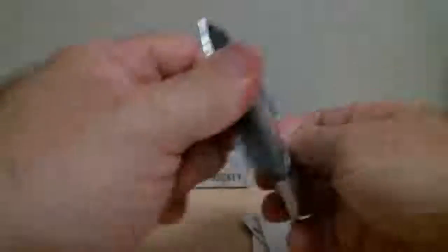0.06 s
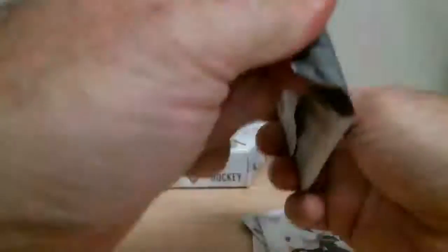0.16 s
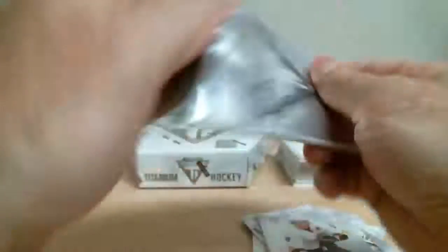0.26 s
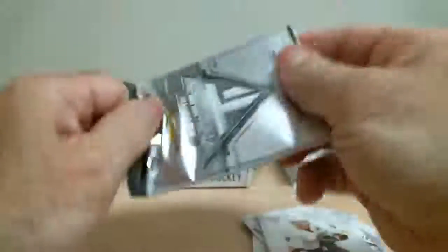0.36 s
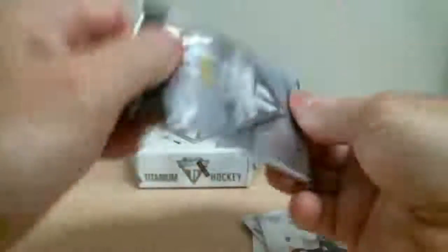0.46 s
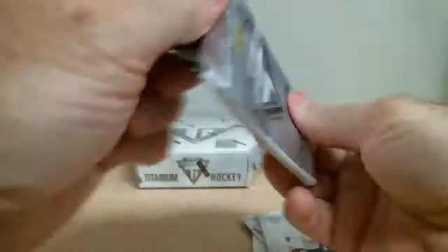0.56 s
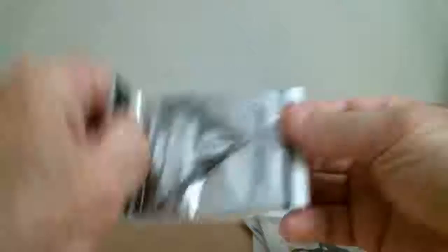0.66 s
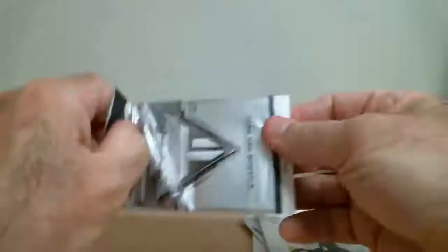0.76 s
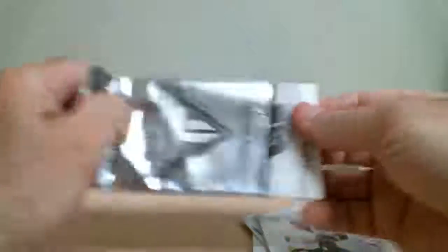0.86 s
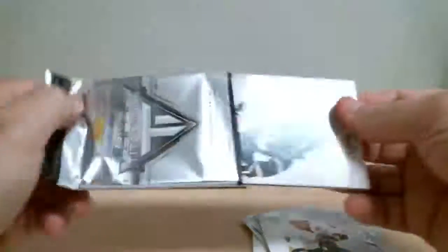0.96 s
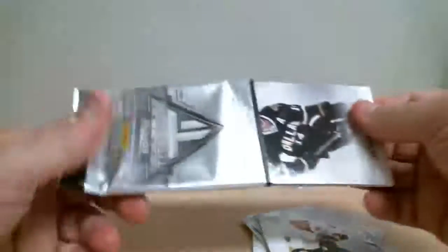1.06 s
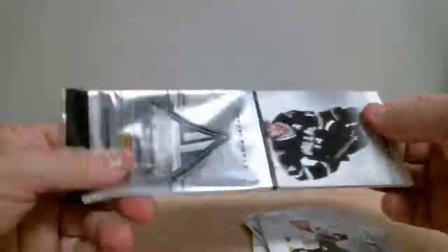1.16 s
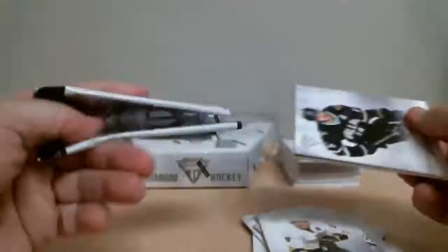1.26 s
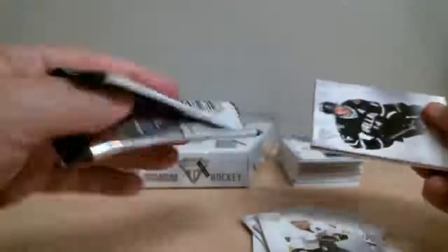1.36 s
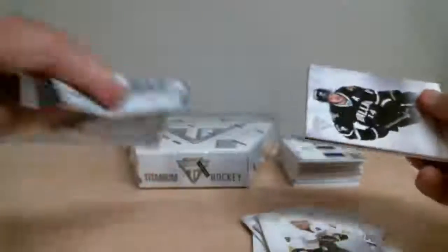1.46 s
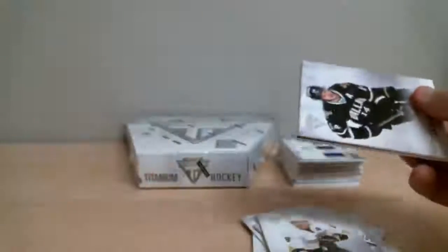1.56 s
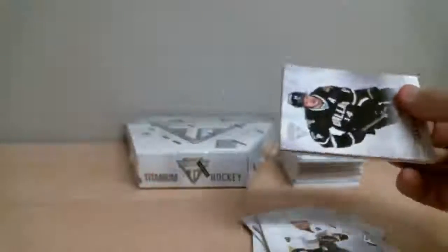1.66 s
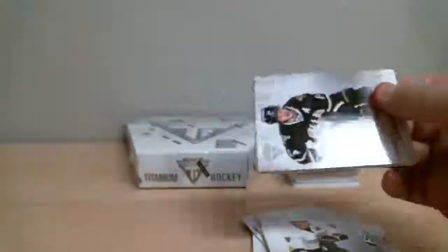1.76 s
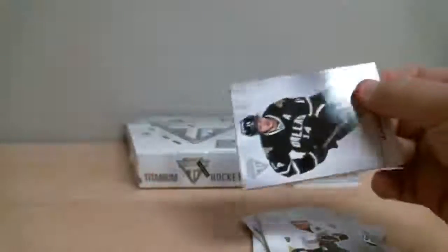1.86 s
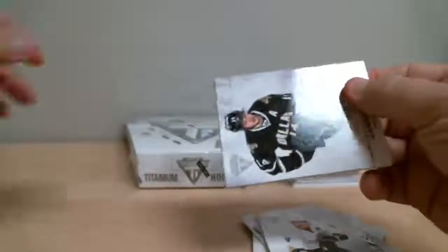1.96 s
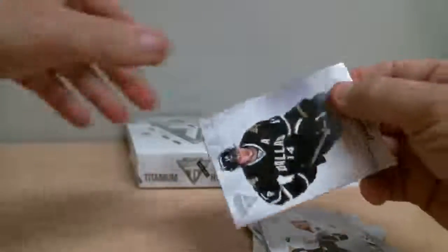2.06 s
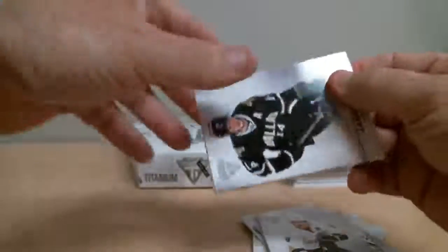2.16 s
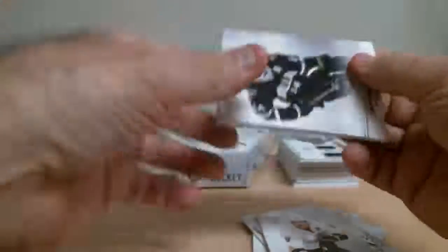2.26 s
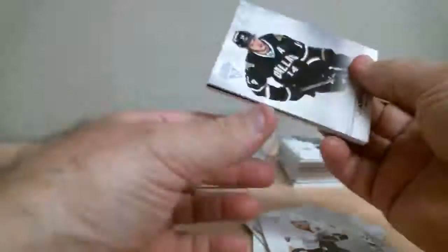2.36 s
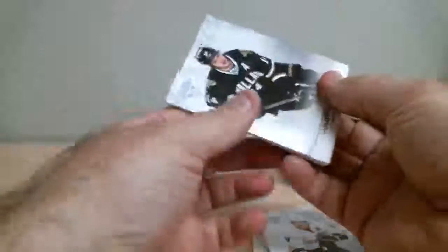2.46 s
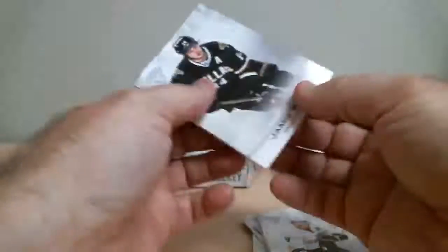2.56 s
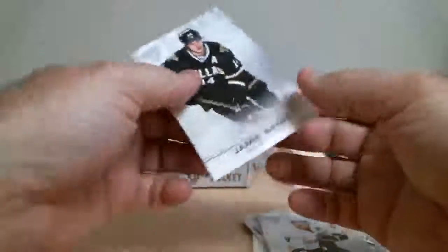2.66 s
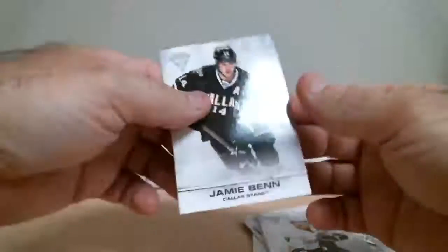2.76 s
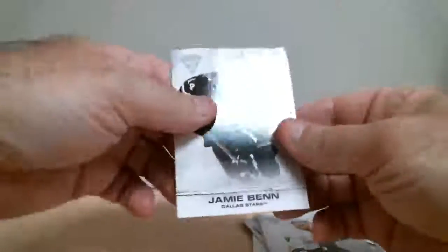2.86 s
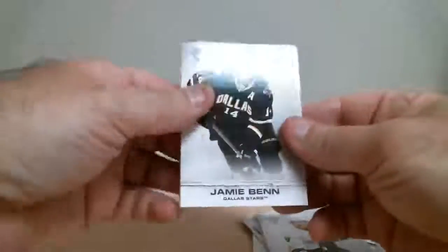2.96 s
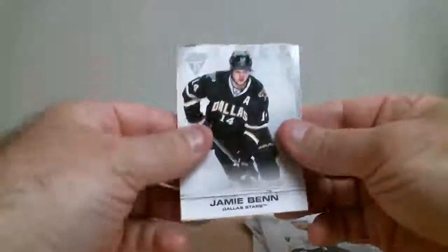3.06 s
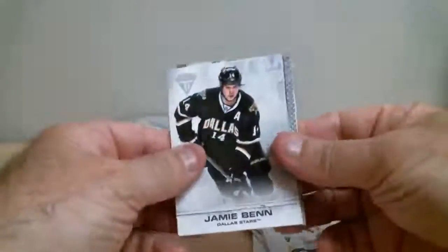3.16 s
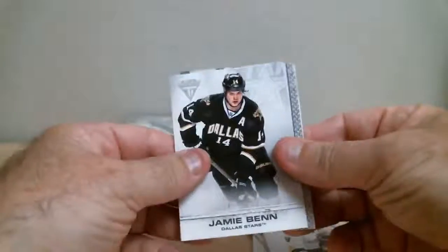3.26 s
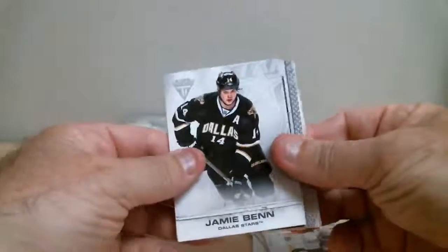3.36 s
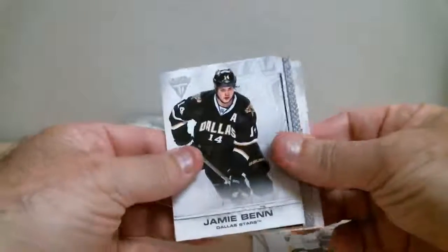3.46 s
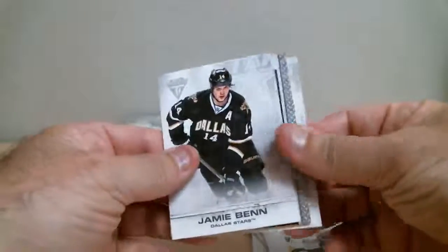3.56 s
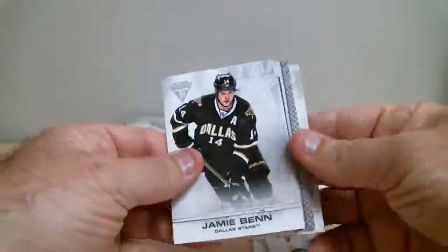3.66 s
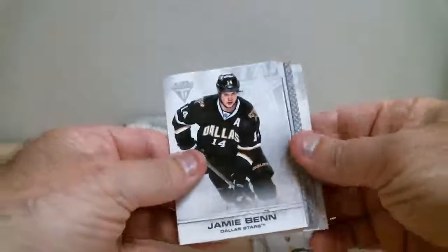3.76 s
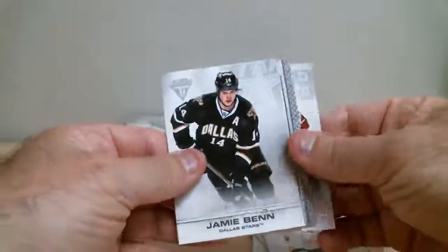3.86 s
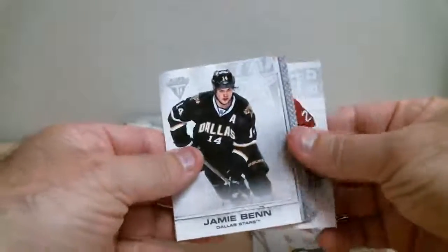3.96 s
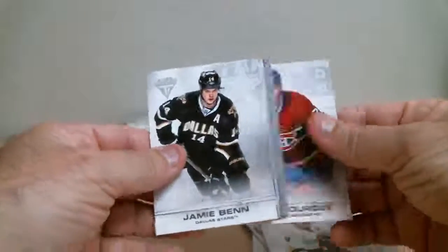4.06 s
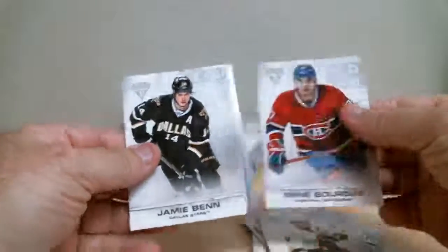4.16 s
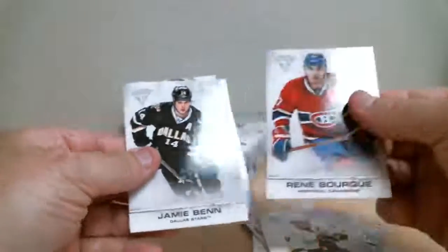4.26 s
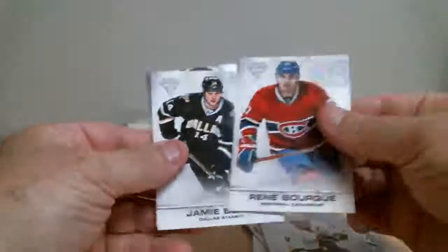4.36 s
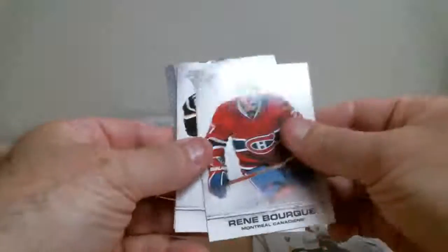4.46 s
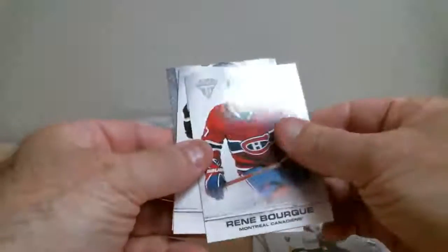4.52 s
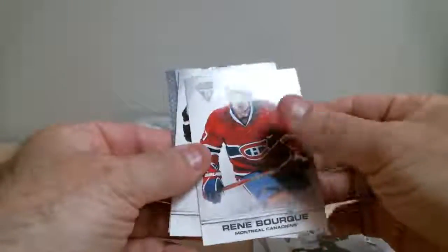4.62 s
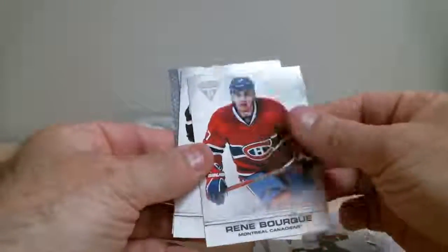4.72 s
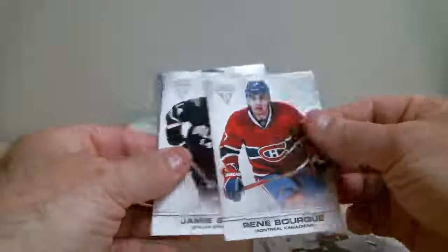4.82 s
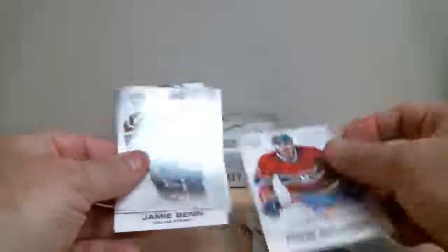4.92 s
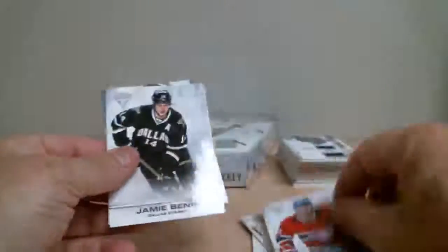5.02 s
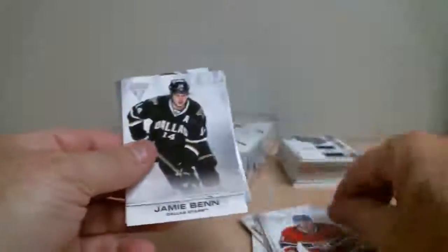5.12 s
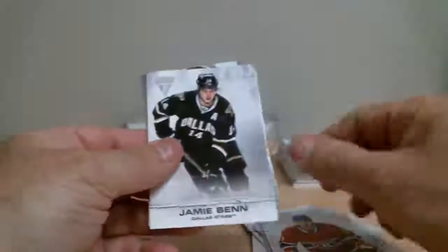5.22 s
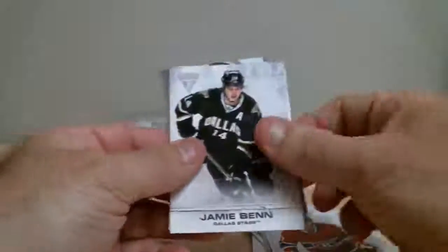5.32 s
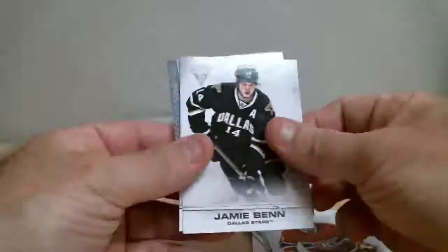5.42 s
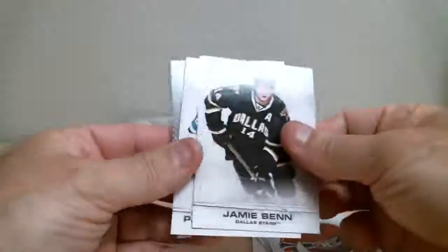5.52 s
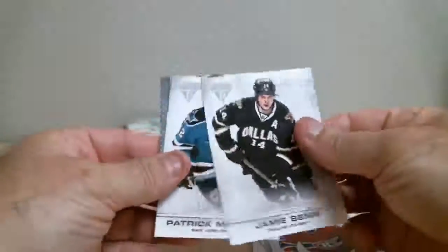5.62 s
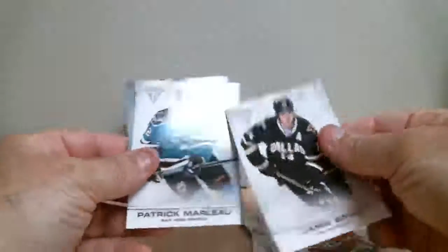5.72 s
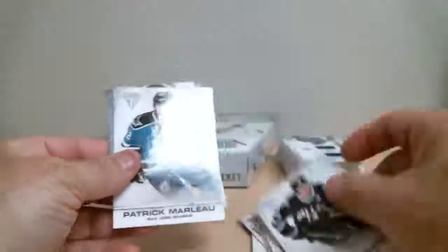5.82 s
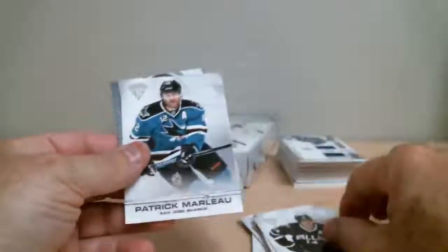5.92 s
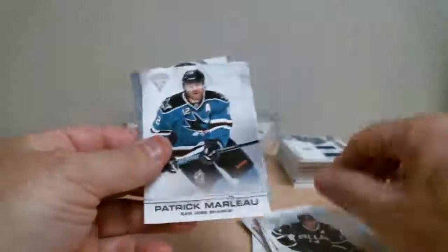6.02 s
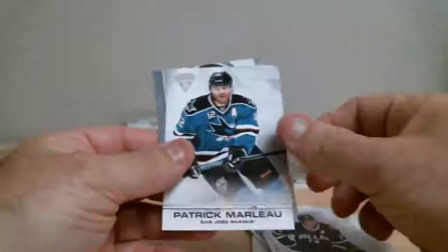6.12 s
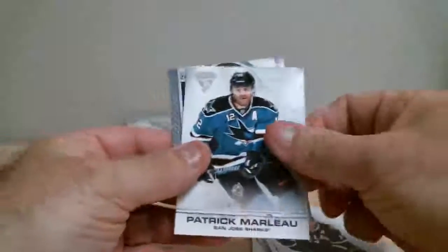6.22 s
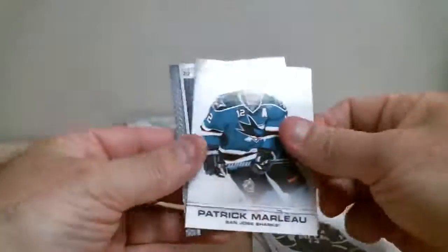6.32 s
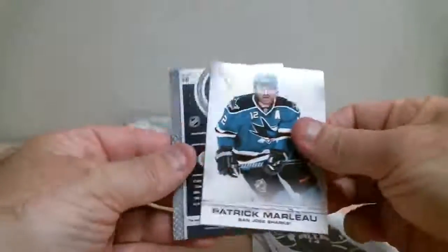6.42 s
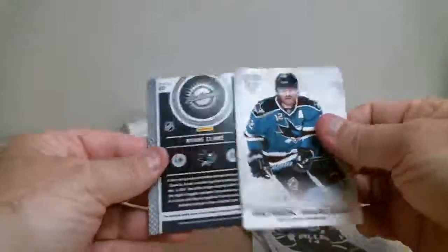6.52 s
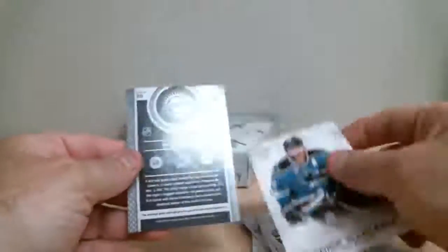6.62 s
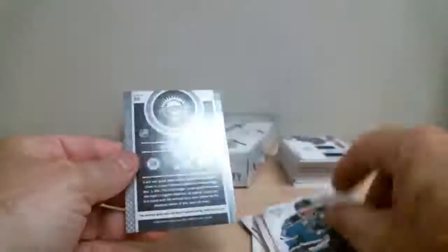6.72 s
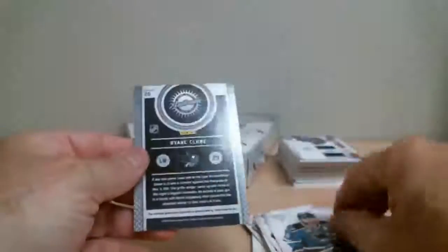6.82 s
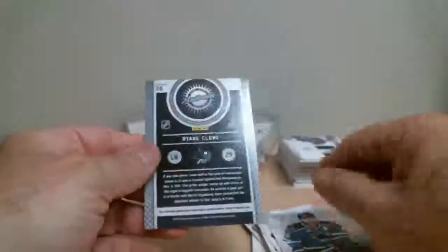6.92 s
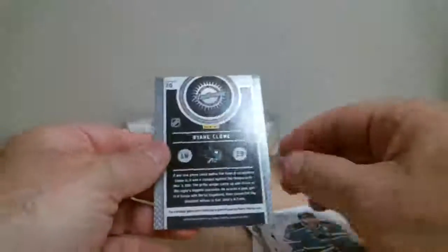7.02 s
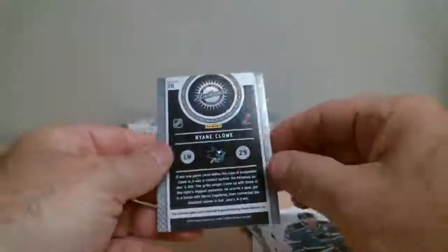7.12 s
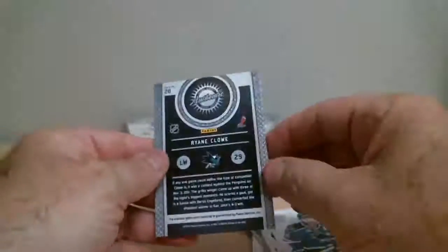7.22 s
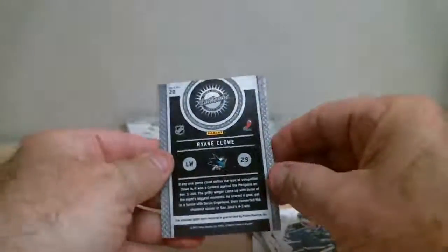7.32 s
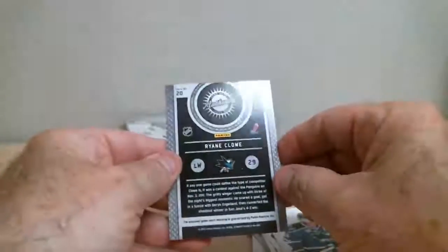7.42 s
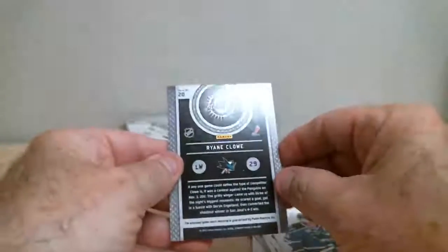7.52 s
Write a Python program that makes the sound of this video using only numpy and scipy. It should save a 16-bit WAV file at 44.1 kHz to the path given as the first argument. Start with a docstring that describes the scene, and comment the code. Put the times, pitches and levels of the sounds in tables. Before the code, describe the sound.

Very close to the microphone, a foil packet is squeezed and torn with loud, bright snaps and dense crackle. After about a second and a half it stops, and stiff glossy cards are handled much more softly: edge clicks, faint rubbing, and three small tap-and-flick sounds as cards are laid on a wooden table. A low fan hum fills the small room throughout.

```python
"""A small room with a humming computer fan: close to a microphone, a foil pack of trading cards is torn and crumpled.
Buckling creases are bursts with damped modes, over a crackle of filtered impulses and a gliding hollow note.
Then the cards are thumbed: edges click as struck modes, faces rub in dense micro-slips, and cards are laid down
on a wooden table, whose knocks are sums of decaying sines. Low rumbles are band-passed impulses.
The fan is filtered noise with narrow-band tones."""
import sys
import numpy as np
from scipy import signal
from scipy.fft import rfft, irfft, next_fast_len
from scipy.io import wavfile
from scipy.ndimage import uniform_filter1d, minimum_filter1d

SR = 44100
rng = np.random.default_rng(int(sys.argv[2]) if len(sys.argv) > 2 else 0)


def log_audio(samples):
    """Write samples as a 16-bit WAV file to the path given in sys.argv[1]."""
    # one column per channel
    frames = np.atleast_2d(samples).T
    # limit to full scale, then quantise
    limited = np.clip(frames, -1, 1)
    pcm = np.round(limited * 32767).astype(np.int16)
    wavfile.write(sys.argv[1], SR, pcm)


N = 334410
TIME = np.arange(N) / SR
TOP_HZ = 15700  # upper limit of the sound

# Spectral colour of foil. Each row: frequency in Hz, gain in dB.
FOIL_COLOUR = [(100, -33), (600, -26), (1300, -14), (2000, -2), (2900, 0.5), (4500, -4.5), (7000, -2.5),
               (10500, 0), (12800, -7), (15500, -14.5)]
# Squeezes or pulls of the pack. Each row: time when firm in s, attack in s, hold in s, release in s,
# crackle drive in dB, panel drive in dB (both relative).
SQUEEZES = [(0.0, .01, 0.078, 0.076, -28.5, -64.5), (0.111, 0.0092, 0.025, 0.15, -23, -33.5),
            (0.301, 0.067, 0.04, 0.063, -13, -24.5), (0.498, .018, 0.0068, 0.05, -5.5, -16),
            (0.564, .03, 0.039, .05, -30.5, -44), (0.66, .035, 0.045, .048, -17, -27),
            (0.779, .008, 0.013, 0.017, -33, -40), (.873, 0.015, 0.12, 0.039, -24.5, -31),
            (1.025, 0.018, 0.0058, 0.019, -21.5, -41), (1.066, .014, 0.013, 0.011, -29, -28.5),
            (1.153, 0.0067, 0.013, 0.12, -17, -35), (1.248, 0.053, 0.044, .025, -16, -22),
            (1.381, .02, 0.038, 0.059, -20, -45.5), (1.529, .017, .005, .035, -22, -46.5)]


def amp(db):
    """Decibels to amplitude ratio."""
    return 10 ** (np.asarray(db) / 20)


def unit(x):
    """Scale to rms 1."""
    return x / np.sqrt(np.mean(x ** 2) + 1e-30)


def add(out, s, x):
    """Superpose x on out from time s in seconds."""
    i = max(int(s * SR), 0)
    out[i:i + len(x)] += x[:max(N - i, 0)]


def curve(rows):
    """Gain that follows (s, dB) rows and is silent after the last."""
    s, db = np.transpose(rows)
    return amp(np.interp(TIME, s, db)) * (TIME < s[-1])


def bump(f, hz, octaves):
    """A Gaussian bell on the log-frequency axis, 1 at its centre."""
    return np.exp(-.5 * (np.log2(f / hz) / octaves) ** 2)


def colour(x, points, hz=1000, bump_db=0, octaves=1, size=1024):
    """Minimum-phase filter through (Hz, dB) points, with a resonance at hz, as wide as octaves says."""
    f = np.maximum(np.arange(size // 2 + 1) * SR / size, 1)
    at, db = np.transpose(points)
    gain = amp(np.interp(np.log(f), np.log(at), db) + bump_db * bump(f, hz, octaves))
    # folding the cepstrum onto positive times makes the filter causal
    cepstrum = irfft(np.log(gain))
    cepstrum[1:size // 2] *= 2
    cepstrum[size // 2 + 1:] = 0
    response = irfft(np.exp(rfft(cepstrum)))
    return signal.fftconvolve(x, response)[:len(x)]


def narrow(hz, width):
    """Narrow-band noise: one slim resonance of random excitation is heard as a wavering tone."""
    size = next_fast_len(N)
    f = np.arange(size // 2 + 1) * SR / size
    resonance = np.exp(-2 * ((f - hz) / width) ** 2)
    return unit(irfft(rfft(rng.standard_normal(size)) * resonance)[:N])


def grains(n, rate, spread_db):
    """Shot noise: tiny impulses at random moments (rate per second), whose sizes vary by spread_db."""
    sizes = amp(spread_db * np.minimum(rng.exponential(1, n), 4))
    struck_now = rng.random(n) < rate / SR
    return unit(struck_now * rng.choice([-1, 1], n) * sizes)


def walk(n, rate):
    """Random modulation: independent levels, rate per second, joined by straight ramps."""
    k = int(SR / rate)
    steps = np.repeat(rng.standard_normal(n // k + 2), k)
    return uniform_filter1d(steps, k)[rng.integers(k):][:n]


def burst(decay_ms, hz, ring, ring_ms, count=5):
    """Impulsive excitation: a sheet jumps with a brief crack and a few damped modes of the facet that moved."""
    t = TIME[:SR // 25]
    ms = 1000 * t
    crack = rng.standard_normal(len(ms)) * np.exp(-ms / decay_ms)
    modes = np.minimum(hz * 2 ** (.5 * rng.standard_normal((count, 1))), TOP_HZ)
    return crack + ring * np.sin(2 * np.pi * modes * t).sum(0) * np.exp(-ms / ring_ms)


def struck(x, db, size=88):
    """Set the rms level of the first samples of a blow."""
    return x * amp(db) / np.sqrt(np.mean(x[:size] ** 2))


def fan():
    """Broadband air noise, narrow-band motor and blade tones, and a mains hum that swells, sinks and swells."""
    # Spectral colour of the air noise. Each row: frequency in Hz, gain in dB.
    air_colour = [(15, -54), (25, -24), (113, -11.5), (240, -8.5), (305, -5), (509, -11), (598, -8),
                  (945, -17), (2170, -18.5), (3930, -29), (4380, -30.5), (8130, -35.5), (15500, -47)]
    # Motor and blade tones. Each row: frequency in Hz, level in dB, width in Hz.
    tones = [(289.3, -62, 5.1), (324, -64.5, 6), (597, -68, 6), (805, -75.5, 10)]
    mains_hz = 120
    air = unit(colour(rng.standard_normal(N), air_colour, size=8192)) * amp(-59)
    swell = curve([(2, -73.5), (2.7, -65), (4.9, -66.5), (5.7, -78.5), (7.7, -63.5)])
    mains = unit(np.sin(2 * np.pi * mains_hz * TIME)) * swell
    return air + mains + sum(amp(db) * narrow(hz, width) for hz, db, width in tones)


def grip(t, s, attack, hold, release):
    """Exponential envelope of one effort of the fingers: it builds, holds and dies away."""
    swing_db = 20.5  # an attack or a release spans this much
    before = np.maximum(s - t, 0) / attack
    after = np.maximum(t - s - hold, 0) / release
    return amp(-swing_db * (before + after))


def squeezing(t):
    """Driving effort on the creases and flexing of whole panels; the strongest squeeze leads in each."""
    return np.max([amp([[crackle_db], [panel_db]]) * grip(t, s, attack, hold, release)
                   for s, attack, hold, release, crackle_db, panel_db in SQUEEZES], axis=0)


def small_creases(count=330):
    """Buckling instability on a small scale: lesser snaps at random moments, each with its own pitch and size."""
    out = np.zeros(N)
    end = SQUEEZES[-1][0] + SQUEEZES[-1][3]
    moments = (np.arange(count) + 2 * rng.random(count)) / count * end
    for s, (pitch, size) in zip(moments, np.clip(rng.standard_normal((count, 2)), -2, 2)):
        hz = 5800 * 2 ** (.55 * pitch)
        crack = burst(decay_ms=.55, hz=hz, ring=.25, ring_ms=1.2)
        add(out, s, struck(colour(crack, FOIL_COLOUR, hz, bump_db=18.5, octaves=0.72), 4 * size))
    return signal.sosfilt(signal.butter(2, 1800, "high", fs=SR, output="sos"), out)


def foil_crackle(count=16):
    """Crackling noise: tiny creases on facets that come and go, lower-pitched panels, and a squeaking seam."""
    # Spectral colour of the larger panels. Each row: frequency in Hz, gain in dB.
    panel_colour = [(60, -18.5), (160, -13), (330, -9), (470, -13.5), (800, 10), (1050, 0.5), (1400, 5),
                    (2000, 4), (3300, -5.5), (7000, -29)]
    n = 2 * SR  # the crackle lies within the first two seconds
    out, facets = np.zeros(N), 0
    effort, flex = squeezing(TIME[:n])
    for hz in np.geomspace(2000, 11500, count):
        impulses = grains(n, rate=440, spread_db=4.0)
        ticks = unit(colour(impulses, FOIL_COLOUR, hz, bump_db=25, octaves=0.075))
        # large facets need a firm squeeze before they give
        gives = effort / (effort + 0.068 * (2000 / hz) ** 3)
        facets = facets + ticks * gives * amp(4 * walk(n, rate=59)) / np.sqrt(count)
    creases = facets * amp(-7) + small_creases()[:n] * amp(-0.5)
    panels = unit(colour(grains(n, rate=690, spread_db=4.5), panel_colour))
    add(out, 0, creases * effort + panels * flex * amp(-3.0))
    # the seam squeaks as it parts
    squeak = narrow(4700, 450) * amp(3.4 * walk(N, rate=220) - 26.5)
    return out + squeak * grip(TIME, s=0.062, attack=0.05, hold=0.026, release=.018)


def foil_snaps():
    """Modal radiation: each buckling crease rings its own small facet, which radiates little below its pitch."""
    # The loudest creases that buckle. Each row: start in seconds, level in dB, pitch in Hz.
    loud_creases = [(.079, -19, 7600), (0.1142, -8, 6940), (.127, -6.5, 4230), (.133, -9, 6850),
                    (0.1564, -4.5, 7090), (.1722, -15.5, 7700), (0.181, -14.5, 7060), (.227, -13.5, 7350),
                    (.24, -13, 6470), (0.2685, -10, 4525), (0.279, -6, 5550), (.2932, -3, 3010),
                    (.3042, -6.5, 5100), (.311, -5.5, 6430), (.3176, -8, 6860), (0.3221, -5, 6470),
                    (.3352, -5, 5800), (0.3414, -4, 4212), (.35, -9, 7494), (0.3592, -7, 5330),
                    (.371, -18.5, 6500), (0.4324, -17.5, 9000), (.4607, -19, 6240), (.497, -7, 6530),
                    (0.505, -4.5, 3589), (0.5119, -13, 3000), (0.518, -13, 5026), (0.543, -16, 6400),
                    (.576, -13.5, 5770), (0.6234, -15.5, 7200), (0.6538, -12, 4092), (0.662, -0.5, 6440),
                    (0.6733, -12.5, 4900), (.6955, -3.5, 3460), (.699, -4, 6120), (0.7073, -15.5, 4500),
                    (0.7803, -10.5, 6260), (0.8134, -21.5, 3900), (0.8567, -20.5, 3120),
                    (0.8737, -9.5, 6800), (0.8823, -9.5, 3530), (0.9345, -13.5, 5300), (0.973, -6, 7450),
                    (1.007, -19.5, 4300), (1.019, -18, 3880), (1.069, -17, 4195), (1.072, -17, 6600),
                    (1.0852, -20.5, 5300), (1.1506, -14.5, 4100), (1.163, -6.5, 7500), (1.171, -8, 5930),
                    (1.231, -7, 4750), (1.2666, -13, 3836), (1.299, -12, 7800), (1.3143, -14, 7060),
                    (1.342, -25, 10600), (1.3756, -9, 7000), (1.4049, -7, 4920), (1.415, -10, 5660),
                    (1.4481, -10, 6860), (1.4618, -16.5, 6700), (1.5305, -6.5, 7320)]
    out = np.zeros(N)
    for s, db, hz in loud_creases:
        snap = burst(decay_ms=1.0, hz=hz, ring=0.27, ring_ms=1.49)
        snap = colour(snap, FOIL_COLOUR, hz, bump_db=9, octaves=0.67)
        low_cut = signal.butter(2, min(0.36 * hz, TOP_HZ), "high", fs=SR, output="sos")
        add(out, s, struck(signal.sosfilt(low_cut, snap), db))
    return out


def pouch(width_hz=310):
    """Cavity resonance: crackle rings the air in the pack; the note sinks and fades as the walls move apart."""
    # Bulges of the pouch. Each row: start in seconds, length in seconds, first pitch in Hz, last pitch in Hz,
    # level in dB before the fade.
    bulges = [(.258, 0.14, 2150, 600, -27), (0.49, 0.061, 1900, 800, -18), (0.655, 0.063, 2100, 750, -23),
              (0.861, .1, 2600, 750, -32.5), (1.147, .11, 1500, 850, -21.5), (1.369, .1, 2965, 525, -26)]
    out = np.zeros(N)
    for s, length, first_hz, last_hz, db in bulges:
        u = np.linspace(0, 1, int(length * SR))
        pitch = first_hz * (last_hz / first_hz) ** u
        carrier = np.exp(2j * np.pi * np.cumsum(pitch) / SR)
        crackle = grains(len(u), rate=900, spread_db=5.5) * amp(2.1 * walk(len(u), rate=120))
        # shift the gliding pitch to 0 Hz, low-pass, then shift back
        band = signal.sosfilt(signal.butter(2, width_hz, fs=SR, output="sos"), crackle / carrier)
        note = unit((band * carrier).real)
        add(out, s, note * signal.windows.tukey(len(u), .05) * amp(db - 18.0 * u))
    return out


def low_rumbles():
    """Band-passed shot noise: the pack puffs, cards shift in it, later fingers rub the stack."""
    # Dull rumbles and rubs. Each row: start in seconds, length in seconds, level in dB before the fades,
    # pitch in Hz.
    rumbles = [(0.493, .03, -29, 278.8), (.93, .18, -41.5, 139.7), (1.215, .1, -34, 189),
               (2.33, .16, -60, 134), (2.76, 0.072, -63, 561), (6.39, 0.2, -57.5, 680),
               (6.55, 0.071, -48, 295), (6.86, 0.14, -50.5, 149.6), (7.04, 0.32, -61, 455),
               (7.31, .08, -55.5, 292), (7.41, .07, -56, 140.5)]
    edge_ratio = 1.87  # each band edge lies this factor from the pitch
    out = np.zeros(N)
    for s, length, db, hz in rumbles:
        n = int(length * SR)
        band = signal.butter(1, [hz / edge_ratio, hz * edge_ratio], "band", fs=SR, output="sos")
        rumble = signal.sosfilt(band, signal.sosfilt(band, grains(n, rate=700, spread_db=2.5)))
        add(out, s, unit(rumble) * np.hanning(n) * amp(db))
    return out


def knocks(rows):
    """Modal excitation: a dull thump wakes the modes nearest its pitch, each a decaying sine."""
    # Modes of the table with the card pile. Each row: frequency in Hz, relative level in dB,
    # 60 dB decay time in seconds.
    table_modes = [(110, 2, 0.035), (149, -5, 0.037), (185.2, -2.5, 0.047), (294, 2.5, 0.14),
                   (341, -1, .07), (362, 5, 0.076), (570, -4.5, 0.036), (719.4, -6.5, 0.13),
                   (916.5, -5, 0.037)]
    out, t = np.zeros(N), TIME[:SR // 4]
    f, mode_db, t60 = np.transpose(table_modes)[:, :, None]
    for s, db, hz in rows:
        detuned = f * (1 + 0.021 * rng.standard_normal(f.shape))
        decay = np.exp(-np.log(1000) * t / t60)
        rings = np.sin(2 * np.pi * (detuned * t + rng.random(f.shape))) * decay
        excited = amp(mode_db + 22 * bump(f, hz, octaves=0.3))
        knock = (rings * excited).sum(0) * (1 - np.exp(-t / 0.00075))  # soft onset
        add(out, s, struck(knock, db, size=660))
    return out


def card_clicks(rows, ring_db=-14, ring_ms=3.43):
    """Plate bending modes: a card edge slips off the thumb or meets the pile, chatters briefly and rings."""
    # Bending modes of a stiff card. Each row: frequency in Hz, relative level in dB.
    bending_modes = [(920, -13), (1900, -1.5), (2550, -11), (3200, -4.5), (4500, 6)]
    # Spectral colour of a card. Each row: frequency in Hz, gain in dB.
    card_colour = [(100, 8), (900, 5.5), (1450, -7), (1900, 0), (4500, -5), (7000, -4.5), (8300, 1),
                   (11000, 0.5), (13000, -19), (15500, -26)]
    out, t = np.zeros(N), TIME[:SR // 25]
    ms = 1000 * t
    f, mode_db = np.transpose(bending_modes)[:, :, None]
    for s, db, hz, decay_ms in rows:
        chatter = grains(len(t), rate=13000, spread_db=1.5) * np.exp(-ms / decay_ms)
        held = f * (1 + 0.034 * rng.standard_normal(f.shape))  # each grip detunes the card
        rings = (amp(mode_db + ring_db) * np.sin(2 * np.pi * held * t)).sum(0) * np.exp(-ms / ring_ms)
        click = colour(chatter + rings, card_colour, hz, bump_db=21.5, octaves=1.0)
        add(out, s, struck(click, db))
    return out


def card_slides(rows, count=5):
    """Sliding friction: glossy faces rub in micro-slips that follow stroke speed; the contact wanders."""
    # Spectral colour of card on card. Each row: frequency in Hz, gain in dB.
    rub_colour = [(200, -8.5), (800, -2.5), (1500, 0), (2200, -3.5), (4500, 2), (7000, -1.5), (11000, 0.5),
                  (13000, -13.5), (15500, -27)]
    catches_per_s, catch_db = 83, -8.5  # edges catch in a quick rattle of ticks, level relative to the slips
    out = np.zeros(N)
    for s, rise, fall, db, hz in rows:
        t = np.arange(-2 * rise, 2 * fall, 1 / SR)
        speed = amp(-19 * np.abs(t / np.where(t < 0, rise, fall)) ** 1.23)
        slips = 0
        for contact_hz in hz * np.geomspace(.72, 1.25, count):
            impulses = grains(len(t), rate=1100, spread_db=0.5)
            patch = colour(impulses, rub_colour, contact_hz, bump_db=14.5, octaves=0.13)
            slips = slips + patch * amp(8.2 * walk(len(t), rate=76.0))
        impulses = grains(len(t), rate=catches_per_s, spread_db=0.5)
        catches = unit(colour(impulses, rub_colour, hz, bump_db=21, octaves=0.68))
        add(out, s + t[0], (unit(slips) + catches * amp(catch_db)) * speed * amp(db))
    return out


def laying():
    """Successive impacts and friction of laying cards down: tap, bounce, scrape, flick and flat fall."""
    # Cards laid on the pile. Each row: touch time in seconds, time it leaves the finger in seconds,
    # then levels in dB of tap, knock, flick, slap and thud.
    lays = [(5.0354, 5.1073, -23, -38.5, -24, -18.5, -49), (5.883, 5.9615, -20.5, -28.5, -24, -51, -30.5),
            (6.724, 6.812, -24.5, -31.5, -24, -33.5, -32)]
    tap_hz, tap_ms, knock_hz = 2646, 1.94, 323  # the edge meets the table
    bounce_s, bounce_db = .0128, -8  # and touches once more, softer
    # the far edge drags off the finger; level relative to the flick
    scrape_rise_s, scrape_fall_s, scrape_db, scrape_hz = .025, 0.012, -8, 5500
    flick_hz, flick_ms = 4498, 3.5
    drop_s, thud_hz = .011, 170  # then the card falls flat
    clicks, slides, blows = [], [], []
    for touch, leave, tap_db, knock_db, flick_db, slap_db, thud_db in lays:
        bounce, landing = touch + bounce_s, leave + drop_s
        clicks += [(touch, tap_db, tap_hz, tap_ms),
                   (bounce, tap_db + bounce_db, tap_hz, tap_ms),
                   (leave, flick_db, flick_hz, flick_ms),
                   (landing, slap_db, flick_hz, tap_ms)]
        slides += [(leave, scrape_rise_s, scrape_fall_s, flick_db + scrape_db, scrape_hz)]
        blows += [(touch, knock_db, knock_hz),
                  (bounce, knock_db + bounce_db, knock_hz),
                  (landing, thud_db, thud_hz)]
    return clicks, slides, blows


def room(x, near_db, near_t60, far_db, far_t60):
    """Reverberation: quick scatter from desk, hands and wall, then the faint tail of a furnished room."""
    t = TIME[:SR // 2]
    echo = 0
    for db, t60 in (near_db, near_t60), (far_db, far_t60):
        tail = rng.standard_normal(len(t)) * np.exp(-np.log(1000) * t / t60) * (t > .002)
        echo = echo + amp(db) * tail / np.linalg.norm(tail)
    return x + signal.fftconvolve(x, echo)[:N]


def scene():
    """Superposition: foil and cards with the room's echo, plus thumps, low rumbles and the fan without it."""
    # Card edges that flick in the hand. Each row: start in seconds, level in dB, pitch in Hz,
    # decay time constant in ms.
    hand_clicks = [(1.651, -26, 7470, 3.5), (1.839, -32, 2226, 7.3), (2.08, -55, 3990, 2.5),
                   (2.272, -52, 2487, 6.5), (2.307, -47.5, 8940, 5.2), (3.108, -53, 5600, 5.4),
                   (3.564, -37.5, 9160, 5), (3.821, -39, 9000, 0.98), (3.847, -38.5, 9000, 1.43),
                   (3.915, -42.5, 8770, 1), (4.194, -28.5, 3315, 6.2), (4.211, -33, 4500, 4),
                   (4.412, -34.5, 1870, 4.7), (4.79, -50.5, 4980, 2.27), (6.265, -52.5, 6010, 4.2),
                   (6.371, -54.5, 5940, 3.3), (6.635, -45, 8400, 3), (6.674, -36.5, 3140, 4.3)]
    # Card rubbing on card. Each row: time of the fastest point in seconds, rise in seconds, fall in seconds,
    # level in dB, pitch in Hz.
    hand_slides = [(1.679, 0.02, .026, -27, 7440), (1.76, .06, .16, -60, 7030),
                   (2.09, 0.066, 0.047, -63.5, 6990), (2.595, 0.069, .025, -54.5, 9500),
                   (2.89, .017, 0.024, -61.5, 8500), (3.43, 0.078, 0.058, -59, 9000),
                   (3.64, 0.045, 0.024, -51, 9500), (3.87, 0.1, 0.26, -56, 9090),
                   (4.11, 0.089, 0.11, -63, 8460), (4.21, 0.015, .02, -35.5, 3200),
                   (4.44, 0.037, 0.035, -45.5, 4200), (4.528, 0.03, 0.027, -48.5, 9000),
                   (4.935, 0.069, 0.07, -49, 7080), (5.7, 0.22, 0.19, -54, 9500),
                   (5.84, 0.074, 0.01, -43.5, 8400), (6.47, .075, .13, -52, 9700),
                   (6.59, 0.076, 0.083, -49, 7500), (6.673, 0.032, 0.021, -38.5, 5830),
                   (7.245, .04, 0.039, -60, 2130)]
    # Dull thumps of cards shifting in the pack, later of hands and table.
    # Each row: start in seconds, level in dB, pitch in Hz.
    thumps = [(.958, -35, 280), (1.023, -37.5, 130), (1.066, -35, 167), (1.245, -40.5, 330),
              (1.268, -37.5, 160), (1.448, -41.5, 720), (2.21, -51, 550), (2.466, -53.5, 130.3),
              (3.85, -54, 669), (4.098, -51.5, 300.5), (4.195, -44, 325), (4.214, -43, 920),
              (4.404, -52, 328), (4.527, -50.5, 680), (4.715, -51, 330), (4.91, -53.5, 900),
              (6.891, -50.5, 140), (7.232, -49.5, 547)]
    clicks, slides, blows = laying()
    foil = foil_snaps() + foil_crackle() + pouch()
    cards = card_clicks(hand_clicks + clicks) + card_slides(hand_slides + slides)
    echoing = room(foil + cards, near_db=-14.5, near_t60=0.082, far_db=-28, far_t60=0.32)
    return (echoing + knocks(thumps + blows) + low_rumbles() + fan())[None]


def record(dry):
    """Peak limiting and band limiting: the loudest snaps are held down, the deepest bass and the top are cut."""
    ceiling, limiter_s = 1.1, .0004
    size = int(limiter_s * SR)
    wanted = ceiling / np.maximum(np.abs(dry), ceiling)
    gain = uniform_filter1d(minimum_filter1d(wanted, size), size)
    held = signal.sosfilt(signal.butter(1, 35, "high", fs=SR, output="sos"), dry * gain)
    return signal.sosfilt(signal.ellip(10, .2, 80, TOP_HZ, fs=SR, output="sos"), held)


dry = scene()
out = record(dry)
log_audio(out)
```